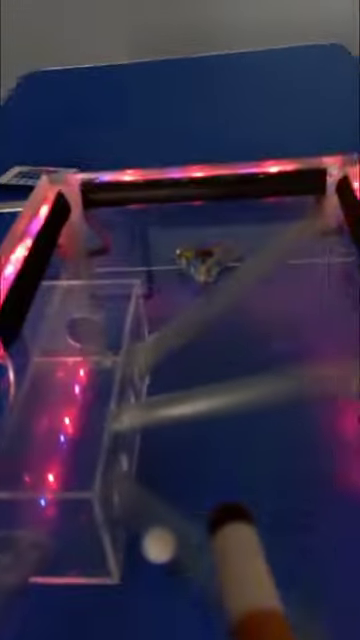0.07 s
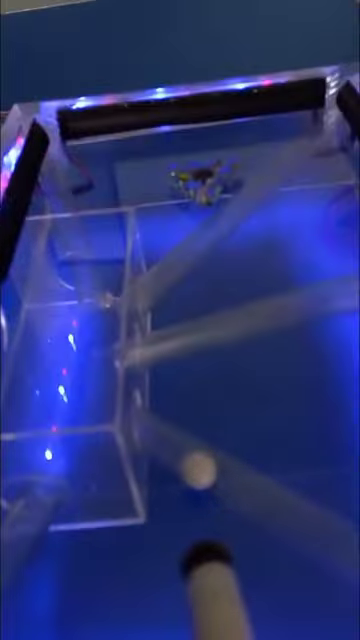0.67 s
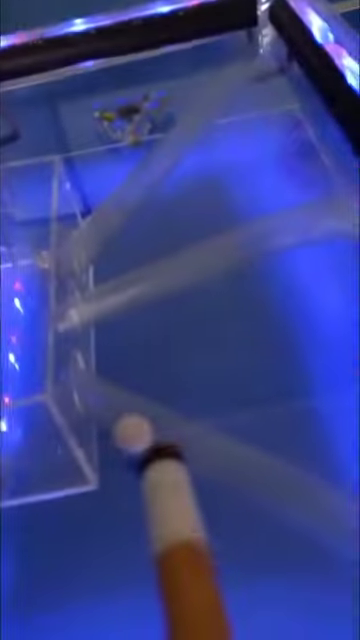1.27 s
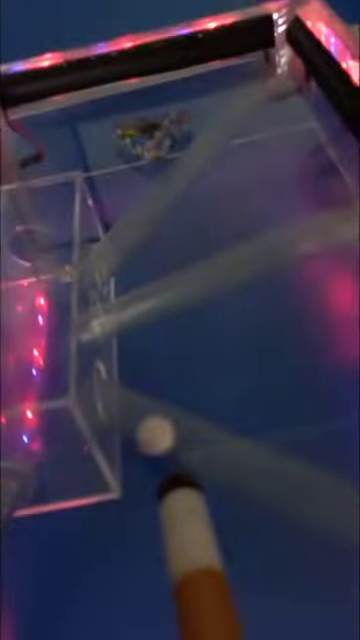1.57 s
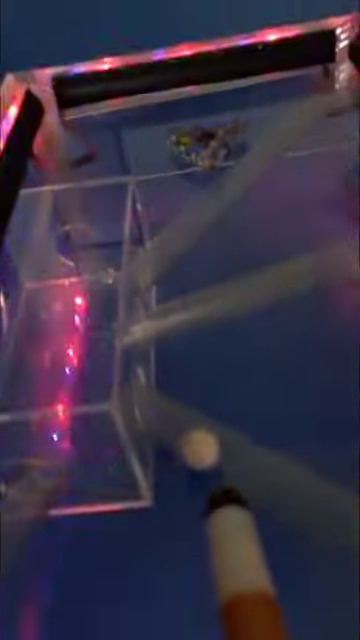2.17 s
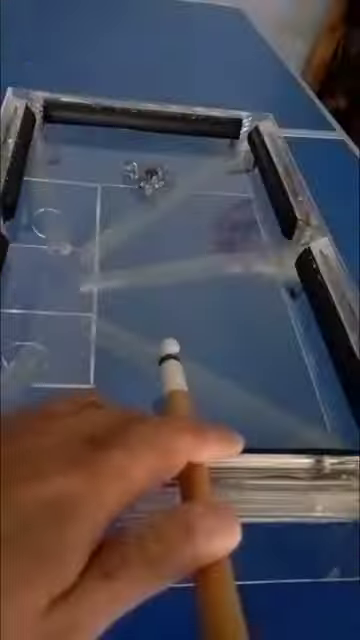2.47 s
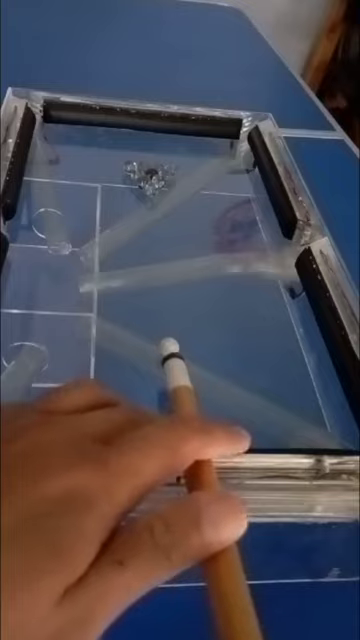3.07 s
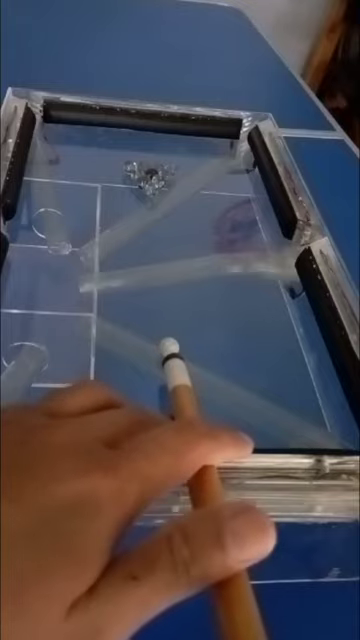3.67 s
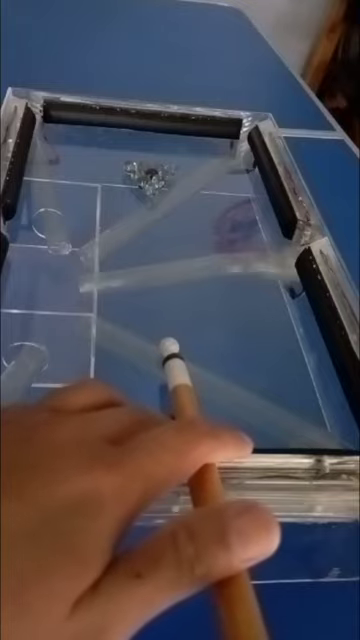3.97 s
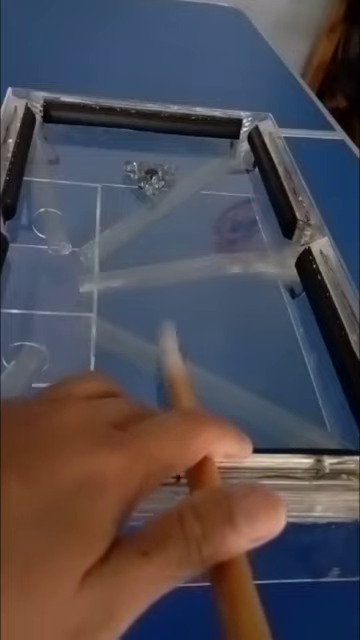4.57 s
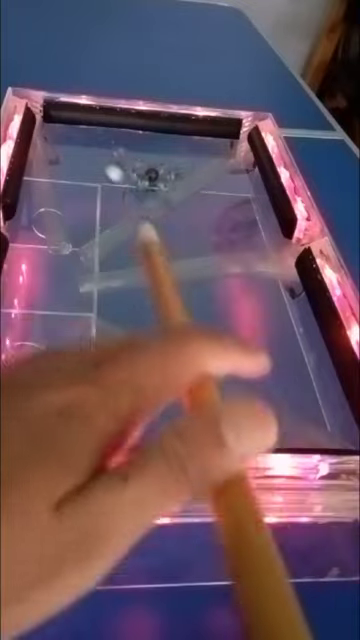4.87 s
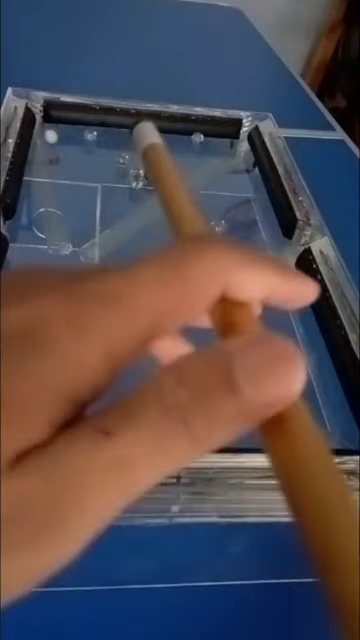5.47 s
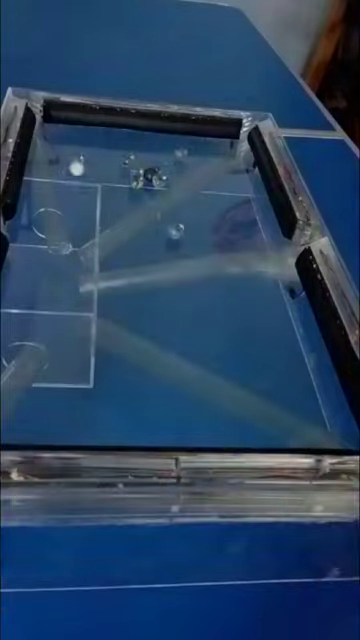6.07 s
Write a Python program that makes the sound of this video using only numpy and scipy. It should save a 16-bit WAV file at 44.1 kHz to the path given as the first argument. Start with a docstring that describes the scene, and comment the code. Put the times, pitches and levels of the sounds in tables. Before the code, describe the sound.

A few soft, sped-up taps and ticks come from a cue and a tiny ball on a plastic pool table, heard up close indoors. A quiet stretch follows, with faint swells of hiss. Then a sharp cue stroke jolts the table and a loud, high clack breaks the rack. The little balls ring like glass and scatter, their drumming roll and gentle bounces fading away.

```python
"""A small room, close to a toy pool table of clear plastic; two scenes joined by a hard cut.
First, at double speed, the cue nudges a little ball that knocks and rolls, ringing the plastic bed.
Then, at normal speed, the cue strikes hard and rocks the table, and the ball cracks into the rack.
The balls ring like glass, rattle, drum over tiny bumps in the bed and bounce off the rubber rails.
Behind it all lie a low room tone and faint swells of hiss."""
import sys
import numpy as np
from scipy import signal
from scipy.fft import rfft, irfft
from scipy.io import wavfile
from scipy.ndimage import uniform_filter1d

SR = 44100
rng = np.random.default_rng(int(sys.argv[2]) if len(sys.argv) > 2 else 0)


def bounce(signal):
    """Save signal as a 16-bit WAV file at the path given by the first command-line argument."""
    frames = np.transpose(np.atleast_2d(signal))
    limited = np.clip(frames, -1, 1)
    pcm = np.round(limited * 32767).astype(np.int16)
    wavfile.write(sys.argv[1], SR, pcm)


N = 279153
T = np.arange(N) / SR
CUT_S, FAST, NORMAL = 2.503, 2, 1  # speed 2 doubles pitch and halves ring time

# ball on ball: (time [s], level [dB], left-right [dB], tilt [dB/octave])
CLACKS = [(1.8622, -52, -8, 0), (2.2134, -43.5, -11, 10), (4.871, -27, 6, -1.5), (4.9085, -6, 4, 3.5),
          (4.9104, -9.5, 1, 5), (4.9146, -11.5, -1, 0.5), (4.9155, -11, -1, -7), (4.9166, -12, 1, 0),
          (5.2, -42.5, 2, -1), (5.2364, -25, 2.5, -12)]
# tick spectrum: (frequency [Hz], gain [dB])
CLACK_SPECTRUM = [(400, -21), (1500, -13.5), (3000, -22), (5200, -16), (6800, -15), (8000, -6.5),
                  (8800, -3.5), (10300, -2), (11400, -6), (13400, -10), (14500, -14.5), (16000, -42)]
# ball modes: (frequency [Hz], level [dB], t60 [s])
BALL_MODES = [(6160, -15, .015), (8170, -4, .014), (9250, -8, .012), (9730, -4, .014), (10480, 1, .018),
              (12100, -11, .014), (13550, -4, .014)]

def clacks(tick_db=-1, ring_db=-8.5, rise_s=.0003, pivot_hz=10000):
    """Hard balls touch so briefly that nearly all is treble: a tick and a short glassy ring."""
    out, t = np.zeros((2, N)), np.arange(SR // 25) / SR
    hz, mode_db, t60 = np.transpose(BALL_MODES)[:, :, None, None]
    for s, db, pan_db, tilt in CLACKS:
        tilted = [(f, gain + tilt * np.log2(max(f / pivot_hz, .5))) for f, gain in CLACK_SPECTRUM]
        add(out, s, amp(db + tick_db) * colour(burst(.0016, likeness=.41), tilted), pan_db)
        phases = stereo_phases(len(hz), spread_rad=.74)
        detune = 1 + .008 * rng.standard_normal()  # no two balls ring alike
        envelopes = amp(mode_db + tilt * np.log2(hz / pivot_hz) - 60 * t / t60)
        ring = (envelopes * np.sin(2 * np.pi * hz * detune * t + phases)).sum(0)
        add(out, s, amp(db + ring_db) * ring * (1 - np.exp(-t / rise_s)), pan_db)
    return out


# cue crack spectrum: (frequency [Hz], gain [dB])
CRACK_SPECTRUM = [(200, -16), (800, -8), (1400, -0.5), (1950, -3.5), (2400, -5), (2900, 2), (3150, 0),
                  (3500, 6), (4200, 5.5), (4800, 6.5), (5250, 2), (5750, -5), (6200, -1), (6800, -7),
                  (7600, -8), (8400, -2), (11000, -2.5), (12000, -9), (12800, -17), (14000, -17)]
# modes of the cue's hard end: (frequency [Hz], level [dB], t60 [s])
CUE_MODES = [(3500, -18, .009), (4400, -16, .009), (4830, -12.5, .012), (5230, -15, .015),
             (8400, -15, .008)]

def cue_strike(at_s=4.72, contact_db=-4, walls_db=-22, rise_s=.00066, walls_s=.013, pan_db=-4):
    """The cue's hard end cracks on the ball and rings briefly; the plastic walls scatter the crack."""
    out, t = np.zeros((2, N)), np.arange(SR // 15) / SR
    contact = burst(.0029, likeness=.1, size=len(t)) * (1 - np.exp(-t / rise_s))
    walls = rng.standard_normal((2, len(t))) * np.exp(-t / walls_s)
    add(out, at_s, colour(amp(contact_db) * contact + amp(walls_db) * walls, CRACK_SPECTRUM), pan_db)
    for hz, db, t60 in CUE_MODES:
        ring = amp(db - 60 * t / t60) * np.sin(2 * np.pi * hz * t)
        add(out, at_s, ring * (1 - np.exp(-t / .00096)), 2 * pan_db)
    return out


# cue and hand on the table: (time [s], level [dB], pitch [Hz], rise [cycles])
THUDS = [(.534, -33, 213, 1.26), (.8755, -36.5, 620, 0.96), (.9615, -33.5, 574, 1.2),
         (1.6616, -35, 790, 1.4), (1.829, -29.5, 230, 0.71), (2.1354, -24, 335, 1), (2.1366, -29, 1085, 3),
         (2.1368, -32.5, 794, 2), (2.144, -34.5, 163, 1), (2.2125, -23.5, 640, 0.85),
         (2.2132, -26.5, 315, 1.15), (2.213, -35.5, 1400, 5.5), (2.2977, -41, 960, 2.3),
         (2.424, -38, 1138, 7), (2.4335, -27, 400, 0.94), (4.7152, -11.5, 330, 0.83),
         (4.719, -9, 315, 1.08)]

def thuds(rock_s=4.737, rock_gap_s=.0181, rock_db=-22, rock_hz=330):
    """Dull blows ring the table for a few cycles; the hard stroke rocks it twice on its feet."""
    out = np.zeros((2, N))
    rebounds = [(rock_s + k * rock_gap_s, rock_db - 2 * k, rock_hz + 29.9 * k, 1.9) for k in range(2)]
    for s, db, hz, rise_cycles in THUDS + rebounds:
        cycles = hz * np.arange(SR // 10) / SR
        age = cycles / rise_cycles
        envelope = (age * np.exp(1 - age)) ** 2
        add(out, s, -amp(db) * envelope * np.sin(2 * np.pi * cycles))
    return out


# balls and cue on bed and rails: (time [s], level [dB], brightness [Hz], left-right [dB])
KNOCKS = [(.531, -37.5, 1360, -16), (.547, -45.5, 2400, -14), (0.875, -39.5, 1090, -7),
          (0.9618, -37, 3340, -9), (1.661, -39, 950, -7), (1.7684, -40, 900, 2), (1.8313, -31, 650, 3.5),
          (1.862, -45, 3500, -13), (1.904, -36, 950, 5), (2.1354, -28.5, 2400, -10.5),
          (2.168, -47, 2200, -5), (2.2138, -28, 1510, -14), (2.298, -33.5, 950, -1),
          (2.4339, -29.5, 1150, -12.5), (2.46, -43, 2700, -6), (4.721, -15, 1560, 2.5),
          (4.8704, -23.5, 2550, 1.5), (4.88, -33.5, 1770, 3), (4.896, -33.5, 1800, 1),
          (4.9089, -26.5, 1750, 1), (4.932, -31, 1500, 2), (5.0037, -30, 1700, 1), (5.095, -40, 2200, 7),
          (5.193, -29.5, 900, -2), (5.2338, -32.5, 3940, -2), (5.283, -37.5, 2000, 3), (5.33, -26, 865, 2),
          (5.3379, -34.5, 2400, 1), (5.371, -34.5, 1800, -1), (5.484, -42, 1630, 1),
          (5.6989, -38.5, 1100, 5), (5.8123, -34.5, 1050, 1), (6.1342, -46, 2500, 0),
          (6.24, -47.5, 1388, 0.5)]

def knocks(start_s, stop_s, speed, middle_db, decay_s, ring_db, low_hz, firm_hz=1520):
    """Each knock ticks and rings the bed; a harder contact is brighter and feeds the ring less."""
    out = np.zeros((2, N))
    for s, db, hz, pan_db in KNOCKS:
        if start_s <= s < stop_s:
            tick = burst(decay_s, likeness=.19)
            for cutoff_hz in (hz, 2 * hz):
                tick = signal.lfilter(*signal.butter(2, cutoff_hz, fs=SR), tick)
            tick = signal.lfilter(*signal.butter(1, low_hz, "high", fs=SR), tick)
            add(out, s, amp(db) * tick * np.sqrt(SR / 2 / hz), pan_db)
            hardness_db = np.log2(hz / firm_hz)  # 1 dB per octave
            add(out, s, amp(db + ring_db - hardness_db) * bed_ring(speed, middle_db), pan_db)
    return out


# plastic bed modes: (frequency [Hz], level [dB], t60 [s])
BED_MODES = [(180, -14.5, .07), (250, -13, .06), (336, -5, .14), (368, 0, .2), (408, -4.5, .11),
             (470, -11, .06), (535, -2.5, .125), (556, -9, .08), (602, -8.5, .08), (685, -12, .07),
             (868, -12, .11), (965, -17, .05), (1130, -22, .04), (1380, -19, .04)]

def bed_ring(speed, middle_db, modes=BED_MODES, middle_hz=570, spot_db=2, low_hz=190):
    """The bed rings a little differently at each spot and radiates no deep bass."""
    t = np.arange(SR // 3) / SR * speed
    hz, db, t60 = np.transpose(modes)[:, :, None, None]
    middle = np.exp(-(2 * np.log2(hz / middle_hz)) ** 2) - .5
    db = db + middle_db * middle + spot_db * rng.standard_normal(db.shape)
    ear_rad = .3 * rng.standard_normal((len(modes), 2, 1))
    lag_rad = .45 * np.arange(len(modes))[:, None, None]
    ring = (amp(db - 60 * t / t60) * np.sin(2 * np.pi * hz * t + ear_rad - lag_rad)).sum(0)
    attack = 1 - np.exp(-t / .001)
    return signal.lfilter(*signal.butter(2, low_hz * speed, "high", fs=SR), ring * attack / 2)


# ball on rubber rail: (time [s], level [dB])
BOUNCES = [(5.52, -28), (5.685, -34), (5.725, -34), (5.785, -38), (5.846, -33), (5.947, -30.5),
           (6.003, -35)]

def rail_bounces(rise_s=.0037):
    """Rubber makes no tick: the bed's ring swells softly."""
    out = np.zeros((2, N))
    for s, db in BOUNCES:
        ring = bed_ring(NORMAL, middle_db=-6.5)
        add(out, s, amp(db) * ring * (1 - np.exp(-T[:ring.shape[1]] / rise_s)))
    return out


# rolling level in each scene: (time [s], low modes [dB], upper modes [dB])
ROLL_NUDGE = [(1.72, -78, -78), (1.8, -47, -49.5), (1.96, -65, -65), (2.16, -49, -54), (2.25, -57, -59),
              (2.29, -46, -46), (2.4, -51, -53), (2.46, -44, -46), (2.503, -48, -48)]
ROLL_BREAK = [(4.76, -32, -47), (4.83, -37.5, -44), (4.9, -43, -43), (4.93, -34, -35), (4.98, -29, -37),
              (5.046, -37, -40.5), (5.095, -30.5, -35.5), (5.14, -31, -38.5), (5.203, -27.5, -29),
              (5.228, -32.5, -30), (5.262, -32, -40), (5.284, -33, -30), (5.314, -30.5, -42),
              (5.336, -33.5, -32.5), (5.388, -34, -37), (5.42, -39.5, -51), (5.496, -44, -51),
              (5.54, -39, -47.5), (5.655, -48.5, -53), (5.71, -41.5, -48.5), (5.765, -46, -49.5),
              (5.84, -42, -48), (5.928, -48.5, -55), (5.96, -43.5, -52), (6.1, -43, -51),
              (6.33, -49, -49.5)]
# rolling grain spectrum: (frequency [Hz], gain [dB])
GRIT_SPECTRUM = [(60, -27), (200, -7), (400, -0.5), (900, 5), (1300, -4), (2000, -16), (3500, -22),
                 (6000, -24), (14000, -27.5)]

def rolling(curve, speed, hum_db, hollow_db, grit_db, bumps_per_s=500, uneven_db=2, split_hz=450):
    """Tiny bumps under the balls drum on the bed: a low hum, a hollow tone above it and dry grain."""
    s, low_db, upper_db = np.transpose(curve)
    low, upper = fader(s, low_db), fader(s, upper_db)
    sizes = amp(uneven_db * np.minimum(rng.exponential(1, (3, N)), 4)) * rng.choice([-1, 1], (3, N))
    bumps = sizes * (rng.random((3, N)) < bumps_per_s * speed / SR)  # left, right, shared
    hum = drumming(bumps.sum(0), [mode for mode in BED_MODES if mode[0] < split_hz], speed)
    hollow = drumming(bumps.sum(0), [mode for mode in BED_MODES if mode[0] >= split_hz], speed)
    grit = unit_rms(colour(bumps[:2] + .93 * bumps[2], GRIT_SPECTRUM, speed)[:, :N])
    tones = amp(hum_db) * low * hum + amp(hollow_db) * upper * hollow
    return tones + amp(grit_db) * np.sqrt(low * upper) * grit


def drumming(bumps, modes, speed, patches=7, patch_s=.07, waver_db=2.2):
    """Bumps keep the bed humming, differently on each patch; the hum wavers about an even level."""
    patch = (T * speed / patch_s).astype(int) % patches
    hum = np.zeros((2, N))
    for k in range(patches):
        hits = bumps * (patch == k)
        hum += signal.oaconvolve(hits[None], bed_ring(speed, 0, modes), axes=1)[:, :N]
    waver = uniform_filter1d(rng.standard_normal(N), size=SR // 50)
    waver = unit_rms(uniform_filter1d(waver, size=SR // 80))
    running_rms = np.sqrt(uniform_filter1d((hum ** 2).mean(0), size=SR // 20) + 1e-9)
    return amp(waver_db * waver) * hum / running_rms


# rattle after the break: (time [s], level [dB])
RATTLE_LEVEL = [(4.86, -44), (4.93, -35), (4.999, -44), (5.12, -43.5), (5.16, -64), (5.21, -44), (5.3, -52),
                (5.39, -50), (5.44, -67)]
# rattle spectrum: (frequency [Hz], gain [dB])
RATTLE_SPECTRUM = [(500, -9.5), (1500, 2), (2600, -8.5), (3800, -5.5), (5500, -13), (9000, -24),
                   (14000, -34)]

def rattle(balls=4, ticks_per_s=260, uneven_db=3, decay_s=.00432):
    """The scattered balls skip over the bed in a rough run of tiny ticks."""
    sizes = amp(uneven_db * np.minimum(rng.exponential(1, (balls, N)), 3))
    skips = sizes * (rng.random((balls, N)) < ticks_per_s / balls / SR)
    ticks = sum(signal.fftconvolve(ball[None], burst(decay_s, likeness=.16), axes=1) for ball in skips)
    return fader(*np.transpose(RATTLE_LEVEL)) * unit_rms(colour(ticks, RATTLE_SPECTRUM)[:, :N])


# lingering partials: (frequency [Hz], level [dB], t60 [s])
SHIMMER_MODES = [(8376, -46, .33), (8699, -45, .33), (9076, -39, .37), (9260, -42, .33), (9781, -39, .19),
                 (9895, -42, .3), (10632, -44, .3), (10985, -40, .28), (11305, -40, .2), (13290, -37, .12),
                 (14115, -46, .3)]

def shimmer(break_s=4.909, gain_db=2):
    """Thin glassy partials ring on after the ball reaches the rack."""
    out, t = np.zeros((2, N)), np.arange(SR // 2) / SR
    hz, db, t60 = np.transpose(SHIMMER_MODES)[:, :, None, None]
    phases = stereo_phases(len(hz), spread_rad=.7)
    partials = amp(gain_db + db - 60 * t / t60) * np.sin(2 * np.pi * hz * t + phases)
    add(out, break_s, partials.sum(0))
    return out


# cue rubs: (time [s], length [s], centre [Hz], level [dB], sharpness [Q])
SQUEAKS = [(.558, 0.033, 9400, -54.5, 7), (1.19, .11, 260, -44, 1), (1.208, 0.02, 10100, -52, 7),
           (1.552, 0.029, 13400, -55.5, 4), (2.042, 0.059, 12600, -48, 0.66), (2.093, .13, 12800, -58, 3),
           (2.254, 0.0079, 9800, -50, 7), (4.32, .095, 4430, -58, 9.2), (4.42, 0.13, 1730, -59.5, 3.6),
           (5.689, 0.3, 7170, -66, 13)]

def cue_squeaks(arch_per_s=.45):
    """The sliding cue makes bands of friction noise, broad scuff to narrow squeak, arching in pitch."""
    out = np.zeros((2, N))
    for s, length_s, hz, db, q in SQUEAKS:
        band = signal.iirpeak(hz, max(q, 1), fs=SR)
        friction = rng.standard_normal((2, SR // 3))
        rub = signal.lfilter(*band, signal.lfilter(*band, friction))[:, :round(length_s * SR)]
        arch = np.sin(np.linspace(0, np.pi, rub.shape[1]))
        shift_hz = arch_per_s * length_s * hz * (arch - np.pi / 4)
        bent = (signal.hilbert(rub) * np.exp(2j * np.pi * np.cumsum(shift_hz) / SR)).real
        add(out, s, amp(db) * unit_rms(bent) * arch)
    return out


# room decay: (frequency [Hz], t60 [s])
ROOM_T60 = [(200, 0.5), (700, 0.38), (2000, 0.36), (5000, 0.39), (10000, 0.36), (14000, 0.31)]
# reverb spectrum: (frequency [Hz], gain [dB])
ROOM_SPECTRUM = [(150, -1.5), (400, -6.5), (1000, -2.5), (2500, 1.5), (3400, -1.5), (4400, -9), (5200, -5),
                 (6200, 0.5), (7500, 0.5), (10300, -1), (14000, -0.5)]

def reverb(x, speed, wet_db, build_s=.0055, mono_hz=600, clump_db=2):
    """Reflections build fast and arrive in clumps; each band dies at its own rate, the bass near mono."""
    hz, t, pair = signal.stft(rng.standard_normal((2, SR * 3 // 4)), SR, nperseg=256)
    hz = hz[:, None] / speed
    bands = correlate(pair, likeness=1 / (1 + (hz / mono_hz) ** 4))
    bands *= amp(at_hz(ROOM_SPECTRUM, hz) - 60 * t * speed / at_hz(ROOM_T60, hz))
    bands *= amp(clump_db * rng.standard_normal(len(t)))
    tail = signal.istft(bands, SR, nperseg=256)[1]
    tail *= 1 - np.exp(-(T[:tail.shape[1]] * speed / build_s) ** 2)
    return amp(wet_db) * signal.fftconvolve(x, tail / np.linalg.norm(tail[0]), axes=1)[:, :N]


# hiss spectrum: (frequency [Hz], gain [dB])
HISS_SPECTRUM = [(600, -16), (1500, 2.5), (3600, 2.5), (4500, 5), (5150, 1), (6000, 5), (7900, -0.5),
                 (8950, 9), (9700, 0), (10400, 5.5), (11800, -2.5), (14000, -2.5)]

def hiss(first_s, speed, db, growth_db_per_s, period_s=1, width_s=.039, flicker_db=3):
    """Distant hiss swells at an even pace; its colour flickers from swell to swell."""
    since_s = (T - first_s) * speed
    off_peak_s = since_s - period_s * np.maximum(np.round(since_s / period_s), 0)
    bands = signal.stft(air_noise(HISS_SPECTRUM), nperseg=256)[2]
    flicker = uniform_filter1d(rng.standard_normal(bands.shape[1:]), size=4, axis=0)
    flicker = unit_rms(uniform_filter1d(flicker, size=16, axis=1))
    noise = unit_rms(signal.istft(bands * amp(flicker_db * flicker), nperseg=256)[1][:, :N])
    return noise * amp(db + growth_db_per_s * since_s) * np.exp(-(off_peak_s / width_s) ** 2 / 2)


# room tone in each scene: (frequency [Hz], relative density [dB])
AIR_NUDGE = [(18, -81), (30, -52), (118, -10), (131, -10.5), (161, -2), (208, -6.5), (243, -3.5), (276, -4),
             (647, -10), (859, -16), (1060, -16.5), (1480, -25.5), (11000, -34), (12900, -36), (14300, -33)]
AIR_BREAK = [(15, -56.5), (25, -48.5), (65, -10), (85, -3.5), (152, -11.5), (183, -7), (252, -13.5),
             (347, -13.5), (545, -18), (590, -23.5), (692, -25.5), (790, -31.5), (5950, -41), (9860, -38.5),
             (14300, -49.5)]
# left-right likeness: (frequency [Hz], coherence [0-1])
AIR_LIKENESS = [(60, 0.8), (180, 0.21), (540, 0.15), (1640, 0.021), (4930, 0.007), (14800, 0.03)]

def air_noise(spectrum):
    """Steady stereo noise, alike at both ears in the bass."""
    hz = np.fft.rfftfreq(N, 1 / SR)
    white = correlate(rfft(rng.standard_normal((2, N))), likeness=at_hz(AIR_LIKENESS, hz) ** .5)
    return unit_rms(irfft(white * amp(at_hz(spectrum, hz)), N))


def burst(decay_s, likeness, size=2048):
    """A blow scattered by the plastic walls: dense, quickly dying noise with an even spectrum."""
    fade = np.exp(-np.arange(size) / SR / decay_s)
    white = rng.standard_normal((3, size))
    x = (np.sqrt(likeness) * white[2] + np.sqrt(1 - likeness) * white[:2]) * fade
    for _ in range(3):  # flatten the spectrum, restore the decay
        x = irfft(np.exp(1j * np.angle(rfft(x)))) * np.sqrt(fade)
    return unit_rms(x) * np.sqrt(np.mean(fade ** 2))


def colour(x, spectrum, speed=1, size=2048):
    """Minimum-phase filter of unit energy."""
    log_gain = np.log(amp(at_hz(spectrum, abs(np.fft.fftfreq(size, 1 / SR)) / speed)))
    taps = np.fft.ifft(np.exp(np.conj(signal.hilbert(log_gain)))).real[:size // 2]
    return signal.fftconvolve(x, taps[None] / np.linalg.norm(taps), axes=1)


def stereo_phases(count, spread_rad):
    """A random phase per mode, offset at each ear."""
    return 2 * np.pi * rng.random((count, 1, 1)) + spread_rad * rng.standard_normal((count, 2, 1))


def correlate(pair, likeness):
    """Blends the left noise into the right at constant power."""
    left, right = pair
    return np.array([left, likeness * left + np.sqrt(1 - likeness ** 2) * right])


def add(mix, s, sound, pan_db=0):
    """Lays a sound into the mix at s seconds; positive pan is left."""
    part = mix[:, round(s * SR):][:, :sound.shape[-1]]
    part += amp([[pan_db / 2], [-pan_db / 2]]) * sound[..., :part.shape[1]]


def at_hz(points, hz):
    """Interpolates on a log-frequency axis."""
    f, value = np.transpose(points)
    return np.interp(np.log(hz + 1), np.log(f + 1), value)


def fader(s, db):
    """Gain over time, silent outside the points."""
    return amp(np.interp(T, s, db, left=-120, right=-120))


def amp(db):
    return 10 ** (np.asarray(db) / 20)


def unit_rms(x):
    return x / np.sqrt(np.mean(x ** 2, axis=-1, keepdims=True) + 1e-20)


def scene():
    """The nudge at double speed, a hard cut, then the break at normal speed."""
    blows, balls = thuds() + cue_strike(), clacks()
    nudge = knocks(0, CUT_S, FAST, middle_db=-.5, decay_s=.0024, ring_db=-6.5, low_hz=240)
    nudge += blows + balls + rolling(ROLL_NUDGE, FAST, hum_db=-.5, hollow_db=-2, grit_db=-27)
    scatter = knocks(CUT_S, N / SR, NORMAL, middle_db=0, decay_s=.008, ring_db=1, low_hz=270)
    scatter += blows + rail_bounces()
    scatter += rolling(ROLL_BREAK, NORMAL, hum_db=0, hollow_db=-.6, grit_db=-5.5) + rattle()
    first = nudge + reverb(nudge, FAST, wet_db=-10.5) + amp(-46.5) * air_noise(AIR_NUDGE)
    first += hiss(first_s=.198, speed=FAST, db=-49, growth_db_per_s=-2.5)
    second = scatter + balls + shimmer() + reverb(scatter + amp(-2) * balls, NORMAL, wet_db=-5)
    second += amp(-48.5) * air_noise(AIR_BREAK)
    second += hiss(first_s=3.5, speed=NORMAL, db=-54.5, growth_db_per_s=1)
    return np.where(T < CUT_S, first, second) + cue_squeaks()


def record(dry):
    """Peaks clip at full scale, then a steep low-pass at 14.3 kHz."""
    lowpass = signal.firwin(801, 14300, window=("kaiser", 8), fs=SR)
    return signal.oaconvolve(np.clip(dry, -1, 1), lowpass[None], "same", axes=1)


dry = scene()
out = record(dry)
bounce(out)
```